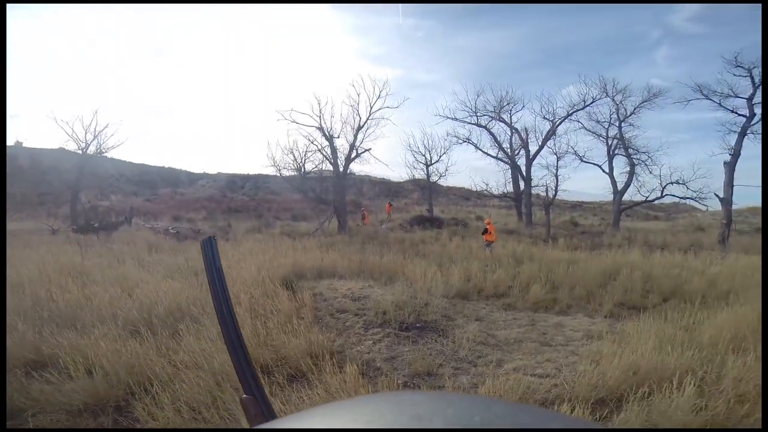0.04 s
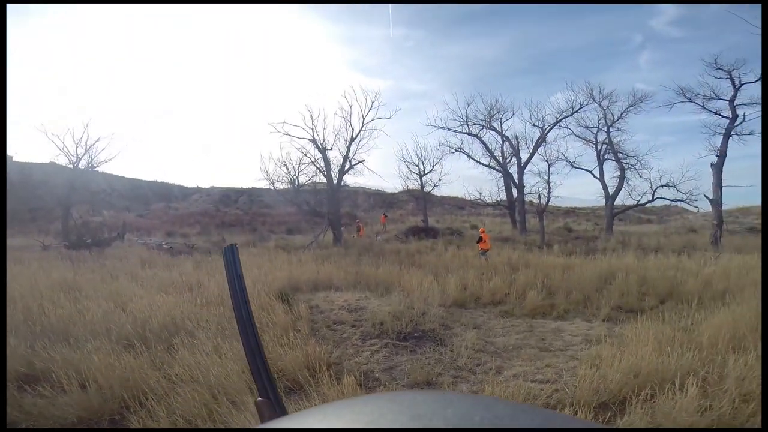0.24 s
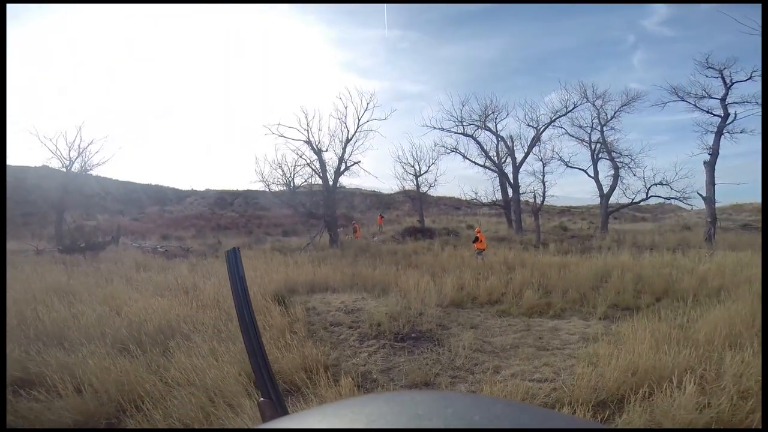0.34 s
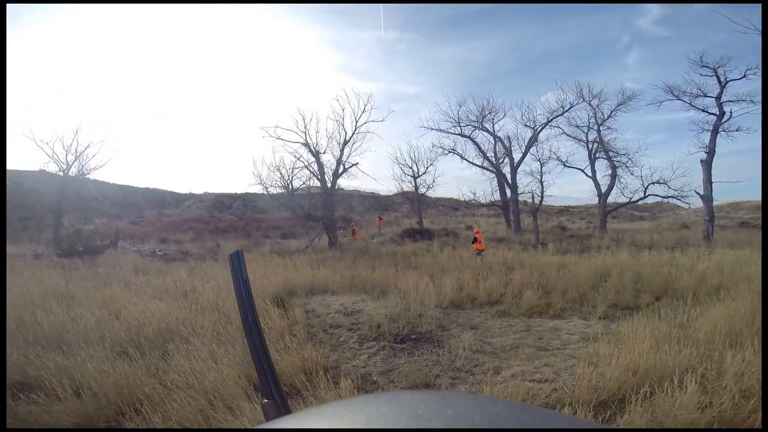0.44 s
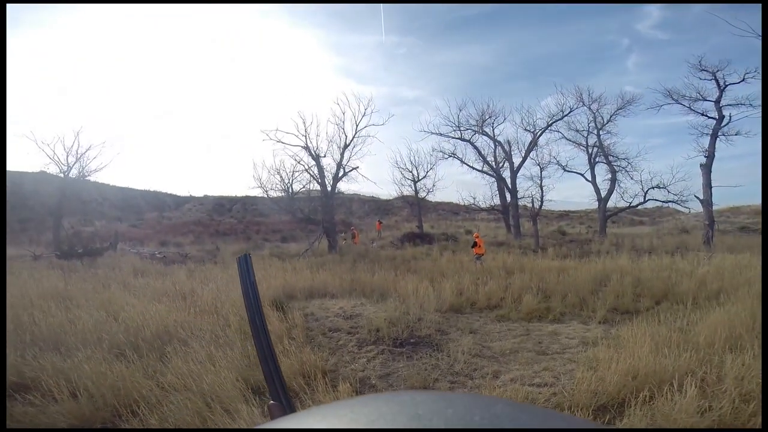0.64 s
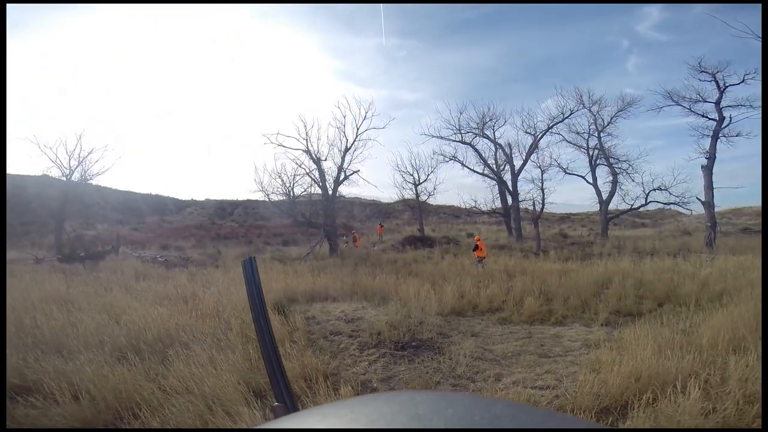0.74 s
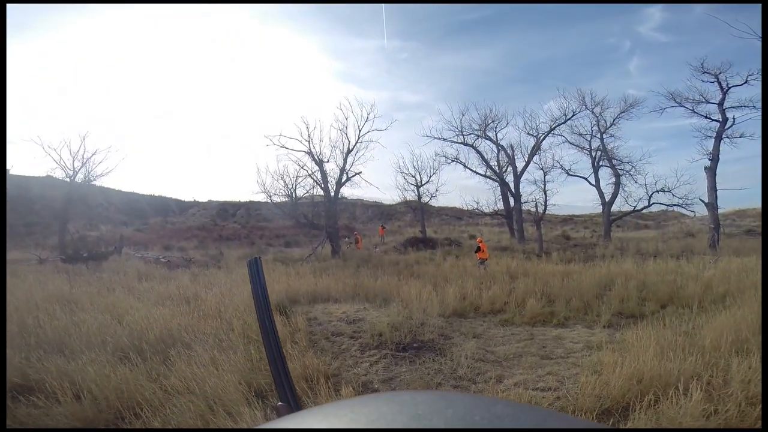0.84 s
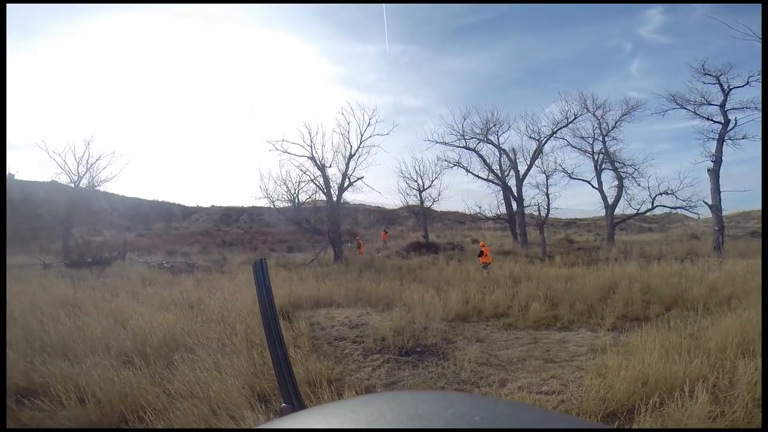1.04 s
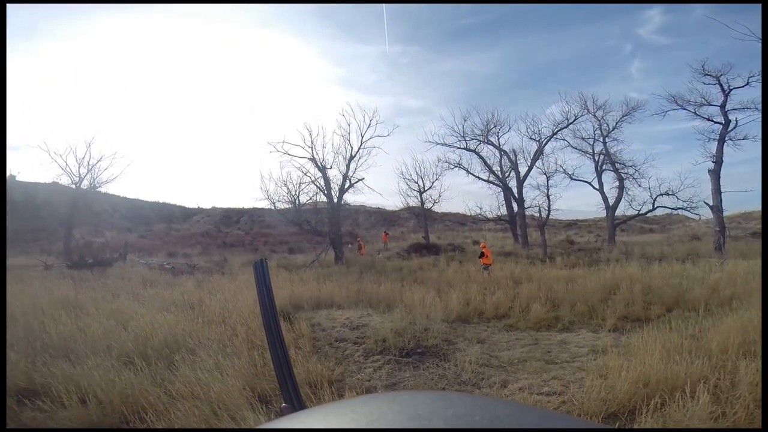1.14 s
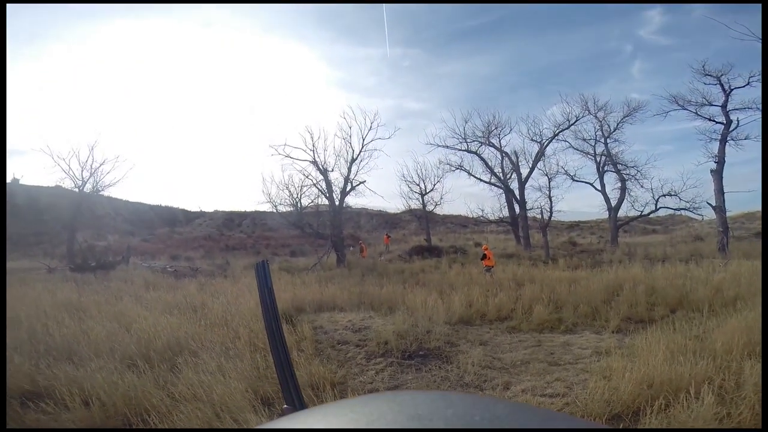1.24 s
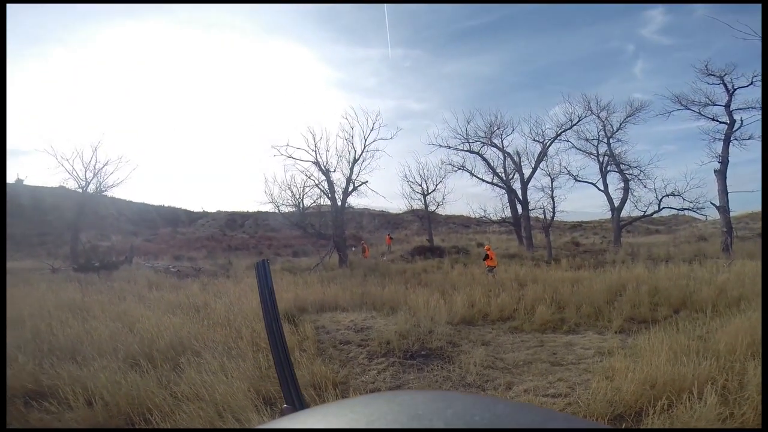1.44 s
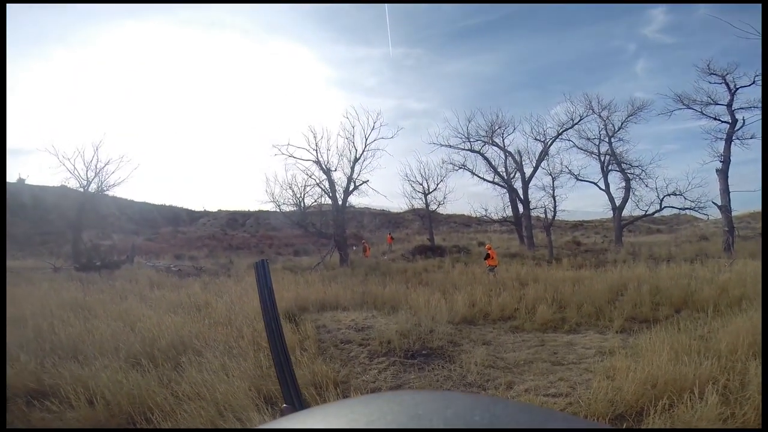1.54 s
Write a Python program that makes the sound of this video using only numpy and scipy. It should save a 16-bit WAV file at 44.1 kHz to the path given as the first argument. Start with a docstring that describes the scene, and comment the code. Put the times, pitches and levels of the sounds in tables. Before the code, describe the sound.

Two loud, sharp rifle shots crack about a second apart across open dry grassland. Each throws a short, rolling echo back from the trees and slopes, with only faint wind underneath.

```python
"""Two rifle shots, 0.9 s apart, crack across dry grassland, heard from beside a parked vehicle.
Each blast rings the microphone's housing for a few milliseconds; grass, trees and a low ridge
scatter it back, much the same way for both shots. Underneath lie light wind, a faint tick
before the second shot and the recorder's thin whine."""
import sys
import numpy as np
from scipy import signal
from scipy.fft import rfft, irfft
from scipy.io import wavfile
from scipy.ndimage import uniform_filter1d

SR = 44100
rng = np.random.default_rng(int(sys.argv[2]) if len(sys.argv) > 2 else 0)


def store_wav(level_fs):
    """Save 16-bit WAV to argv[1]."""
    pcm = np.round(np.clip(np.atleast_2d(level_fs), -1, 1) * 32767)
    wavfile.write(sys.argv[1], SR, pcm.T.astype(np.int16))


N = 70560

# Shots: t/s, blast gain/dB, echo gain/dB
SHOTS = [(0.2006, 0, -2), (1.1040, 0.5, -3)]
def rifle_shots(t, shared_power=0.92):
    """Both blasts meet the same land, so their echoes share most of one reflection pattern."""
    common, out = reflections(), 0
    for shot, (start_s, blast_db, echo_db) in enumerate(SHOTS):
        age = t - start_s
        pattern = np.sqrt(shared_power) * common + np.sqrt(1 - shared_power) * reflections()
        pattern = np.roll(pattern, int(start_s * SR))
        blast = housing_ring(age, shot) + shock_front(age) + lead_snap(age)
        land = grass_rustle(age) + land_echoes(age, pattern) + far_roll(age, pattern)
        out = out + undb(blast_db) * blast + undb(echo_db) * (age > 0) * land
    return out


# Shock front spectrum: f/Hz, relative density/dB
CRACK_SPECTRUM = [(100, -17), (500, -5.5), (1000, -10), (1500, -1.5), (2700, 9.5), (3700, -5.5),
                  (6000, -11.5), (7200, -26), (10000, -28.5), (12000, -19.5), (16000, -32)]
def shock_front(age):
    """The rough front arrives as a few milliseconds of bright noise."""
    noise = steady(colour(rng.standard_normal(N), CRACK_SPECTRUM), samples=130)
    return undb(-20) * burst(age, hold_s=0.0056, fade_s=0.0025) * noise


def lead_snap(age, lead_s=0.0016, width_s=0.0005):
    """A weak snap just ahead of the blast."""
    envelope = np.exp(-0.5 * ((age + lead_s) / width_s) ** 2)
    return undb(-29) * envelope * steady(band(hz=3000, width_hz=1500), samples=90)


# Housing modes: f/Hz, time to peak/ms, relative level in shot 1/dB, in shot 2/dB
HOUSING_MODES = [(132, 3.0, -31.5, -34.5), (400, .7, -34.5, -32.5), (726, 1.5, -20, -21.5),
                 (1340, 2.7, -16.5, -23), (1512, 2.19, -11, -13), (1977, 2, -13.5, -12),
                 (2092, 2.0, -18, -28.5), (2379, 2.1, -9.5, -10.5), (2687, 1.7, -26.5, -13),
                 (2904, 1.3, -11, -15), (3300, 1.4, -29.5, -19.5), (4090, 1.4, -21.5, -26),
                 (4270, 2.2, -33.5, -27), (4870, 1.5, -33, -33.5), (5610, 1.2, -21, -24),
                 (6040, 0.92, -31.5, -21.5)]
def housing_ring(age, shot, scatter_rad=0.2):
    """The blast rings the microphone's housing; modes of alternating sign swell and die."""
    t, ring = np.maximum(age, 0), 0
    phases = scatter_rad * rng.standard_normal(len(HOUSING_MODES))
    for k, (hz, peak_ms, *levels_db) in enumerate(HOUSING_MODES):
        swell = t * 1000 / peak_ms
        envelope = undb(levels_db[shot]) * swell * np.exp(1 - swell)
        ring = ring + (-1) ** k * envelope * np.sin(2 * np.pi * hz * t + phases[k])
    return undb(1) * ring


# Grass scatter spectrum: f/Hz, relative density/dB
GRASS_SPECTRUM = [(100, -15), (400, -15.5), (1000, -8), (1450, -0.5), (2500, -1), (3700, -8), (5500, -8),
                  (7200, -20.5), (12000, -24.5), (16000, -35.5)]
def grass_rustle(age):
    """Near grass scatters the blast straight back."""
    return undb(-27) * burst(age, hold_s=0, fade_s=0.056) * colour(reflections(), GRASS_SPECTRUM)


# Echoes: delay/s, spread/s, relative levels of crackle/dB, thud/dB, boom/dB
ECHOES = [(.044, 0.009, -31, -53, -48.5), (.056, 0.0063, -29, -51, -44.5), (.0875, 0.0014, -27, -60, -73),
          (.105, 0.022, -36, -57, -63.5), (0.148, 0.0093, -30.5, -39, -42),
          (0.169, 0.0084, -35.5, -40.5, -53), (0.199, 0.0059, -59.5, -62, -50), (.47, .009, -66, -79, -67)]
# Spectra of the three echo parts: f/Hz, relative density/dB
CRACKLE_SPECTRUM = [(100, -20.5), (400, -19.5), (1000, -15.5), (1400, 0), (1750, -5.5), (2000, -0.5),
                    (2450, -5), (3100, -7), (3700, -18), (4300, -14.5), (6000, -18.5), (7200, -27.5),
                    (12000, -38.5), (16000, -42)]
THUD_SPECTRUM = [(60, -31), (200, -12), (350, -14.5), (520, -6), (720, 9.5), (860, 2.5), (1100, -23),
                 (3000, -47)]
BOOM_SPECTRUM = [(40, -34), (95, -17), (122, -2), (138, 3.5), (160, -5.5), (220, -20.5), (600, -56)]
def land_echoes(age, pattern, air_db_per_khz_s=6):
    """Each stand of trees or slope returns a smeared echo; air dulls the crackle with distance."""
    thud = steady(colour(pattern, THUD_SPECTRUM), samples=700)
    boom = steady(colour(pattern, BOOM_SPECTRUM), samples=900)
    out = 0
    for delay_s, spread_s, crackle_db, thud_db, boom_db in ECHOES:
        crackle = colour(pattern, CRACKLE_SPECTRUM, air_db_per_khz_s * delay_s)
        envelope = np.exp(-(0.5 * (age - delay_s) / spread_s) ** 2)
        out = out + envelope * (undb(crackle_db) * crackle + undb(thud_db) * thud + undb(boom_db) * boom)
    return out


# Far roll spectrum: f/Hz, relative density/dB
ROLL_SPECTRUM = [(60, -5.5), (140, -4), (300, -12.5), (700, -4), (1000, -8), (1450, 2), (2000, -1.5),
                 (2800, -7), (3800, -18.5), (6000, -22), (8000, -41.5), (16000, -50.5)]
def far_roll(age, pattern, peak_s=0.21, rise_s=0.057, t60_s=0.57):
    """Distant reflections merge into a roll that swells and dies away."""
    rise = np.exp(np.minimum(age - peak_s, 0) / rise_s)
    decay = undb(-60 * np.maximum(age - peak_s, 0) / t60_s)
    return undb(-40.5) * rise * decay * colour(pattern, ROLL_SPECTRUM)


# Field air spectrum: f/Hz, relative density/dB
AIR_SPECTRUM = [(12, -30.5), (20, 0), (45, -7), (86, -22.5), (127, -17), (216, -24.5), (241, -22),
                (388, -27.5), (802, -31), (1330, -33.5), (1760, -34.5), (7950, -46.5), (8890, -47.5),
                (14300, -55), (16000, -67)]
# Gust envelope: t/s, level/dB
GUST = [(0, -45.5), (.05, -46), (.115, -40.5), (.16, -45), (.2, -60.5), (.3, -75.5)]
def wind(t):
    """Quiet, steady air, with a swell of low rumble before the first shot."""
    air = undb(-53.5) * colour(rng.standard_normal(N), AIR_SPECTRUM)
    gust = undb(np.interp(t, *np.array(GUST).T))
    return air + gust * steady(band(hz=33, width_hz=4), samples=2600)


def tick(t, start_s=1.032):
    """One faint tick before the second shot."""
    return undb(-47.5) * burst(t - start_s, hold_s=0, fade_s=0.005) * band(hz=2500, width_hz=625)


def whine(t, hz=8785):
    """The recorder's thin electrical tone."""
    return undb(-74.5) * np.sqrt(2) * np.sin(2 * np.pi * hz * t)


def reflections(grain_db=2, grain_samples=30):
    """Dense reflections of uneven strength, rms 1."""
    noise = rng.standard_normal(N)
    strength_db = grain_db * rng.standard_normal(N // grain_samples + 1)
    return unit(noise * undb(np.repeat(strength_db, grain_samples)[:N]))


def colour(x, spectrum, loss_db_per_khz=0):
    """Shape by a (f/Hz, level/dB) curve to rms 1, then apply the loss above 2 kHz."""
    f = np.fft.rfftfreq(N, 1 / SR) + 1e-3
    hz, db = np.array(spectrum).T
    gain = undb(np.interp(np.log(f), np.log(hz), db))
    shaped = unit(irfft(rfft(x) * gain, N))
    return irfft(rfft(shaped) * undb(-loss_db_per_khz * np.maximum(f / 1000 - 2, 0)), N)


def band(hz, width_hz):
    """Noise in one Gaussian band, rms 1."""
    f = np.fft.rfftfreq(N, 1 / SR)
    gain = np.exp(-0.5 * ((f - hz) / width_hz) ** 2)
    return unit(irfft(rfft(rng.standard_normal(N)) * gain, N))


def burst(age, hold_s, fade_s):
    """Instant attack, hold, exponential release."""
    return (age >= 0) * np.exp(-np.maximum(age - hold_s, 0) / fade_s)


def steady(x, samples):
    """Even out a noise by its running rms."""
    return x / np.sqrt(uniform_filter1d(x ** 2, samples) + 1e-12)


def undb(db):
    """Decibels to gain."""
    return 10 ** (np.asarray(db) / 20)


def unit(x):
    """Scale to rms 1."""
    return x / np.sqrt(np.mean(x ** 2))


def scene():
    """The shots over the quiet field, mono."""
    t = np.arange(N) / SR
    return (rifle_shots(t) + wind(t) + tick(t) + whine(t))[None]


def record(dry, ceiling=1.1, cutoff_hz=15500):
    """The recorder rounds the loudest peaks and cuts the top."""
    soft = dry / (1 + (dry / ceiling) ** 4) ** 0.25
    return signal.sosfilt(signal.ellip(8, 0.2, 70, cutoff_hz, fs=SR, output="sos"), soft)


dry = scene()
out = record(dry)
store_wav(out)
```